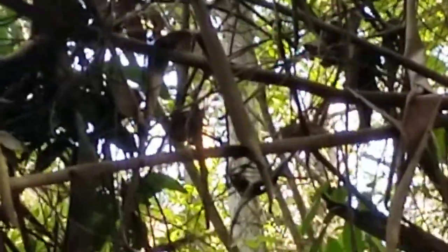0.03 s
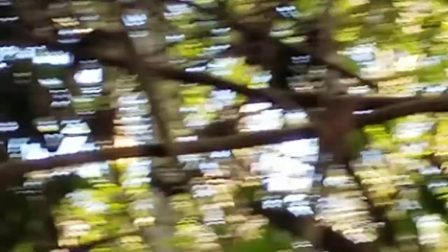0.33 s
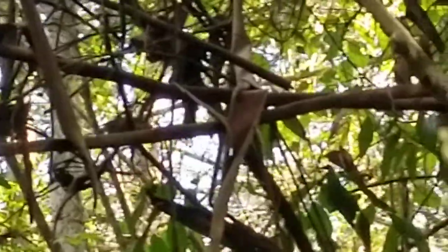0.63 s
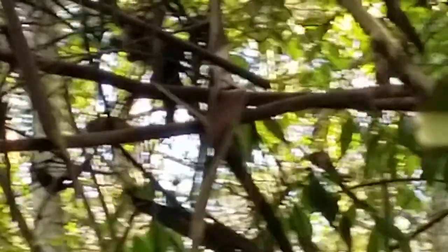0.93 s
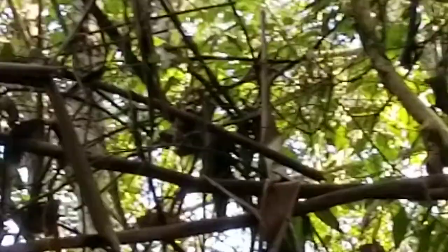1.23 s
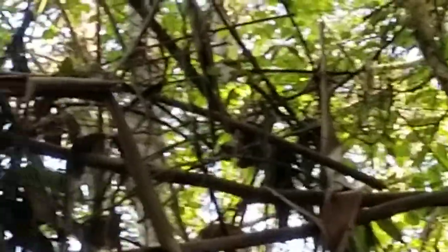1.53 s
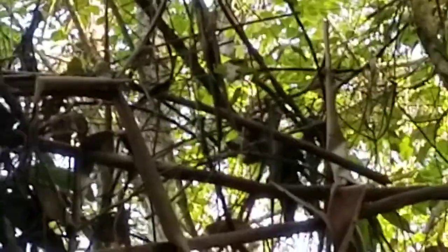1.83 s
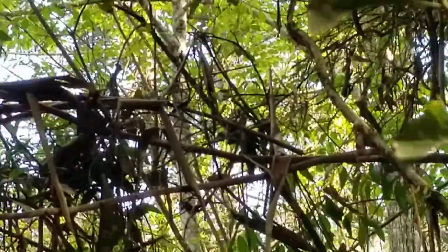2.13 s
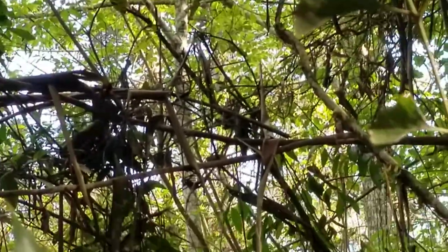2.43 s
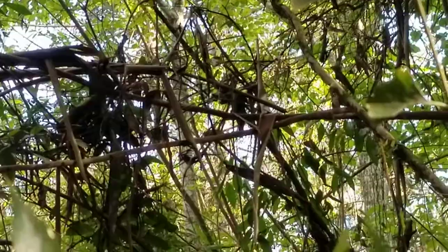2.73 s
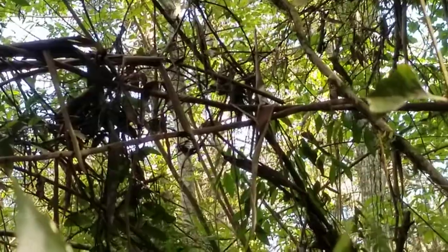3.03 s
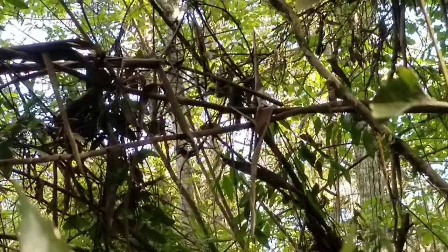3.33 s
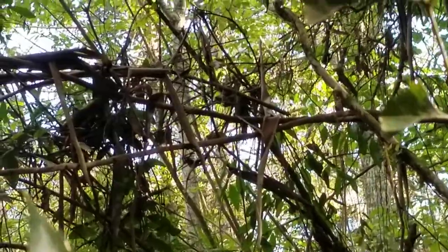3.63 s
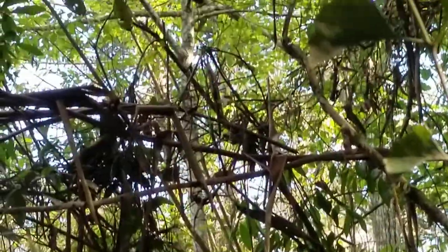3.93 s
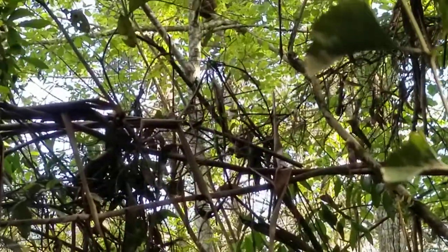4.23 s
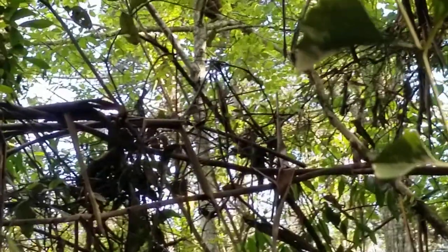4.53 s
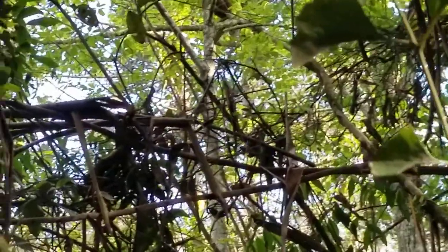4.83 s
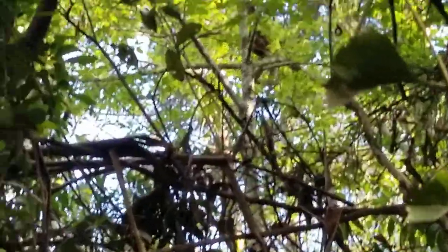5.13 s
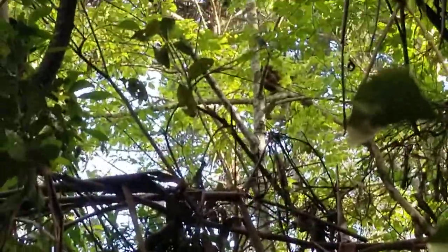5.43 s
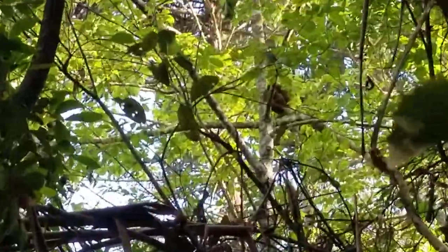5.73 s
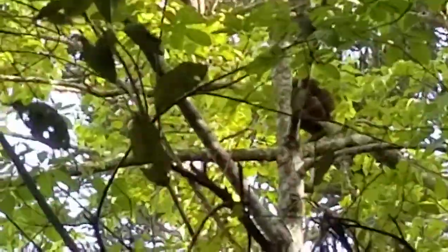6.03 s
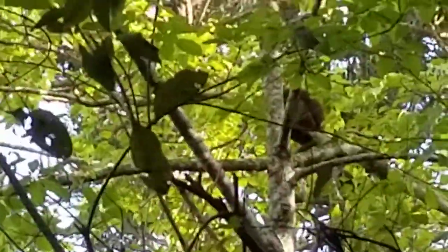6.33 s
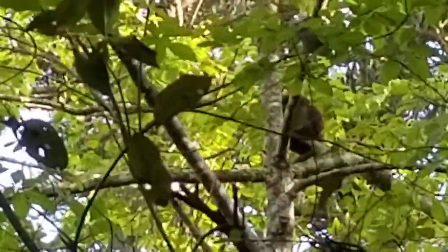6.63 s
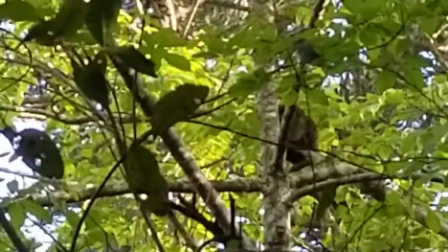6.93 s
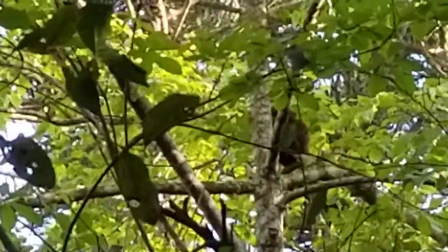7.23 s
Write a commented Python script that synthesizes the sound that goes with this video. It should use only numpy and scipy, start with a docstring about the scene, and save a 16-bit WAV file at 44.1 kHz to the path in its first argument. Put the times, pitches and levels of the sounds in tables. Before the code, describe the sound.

Someone shifts about in a quiet forest with a hand-held microphone. Fingers rub and knock sharply on the left at the start, then leaves brush and crackle in light swishes and small twigs snap throughout. Distant birds whistle with a blurred echo, and a nearer one gives a few hoarse, falling calls midway. A faint drone of far engines and a soft wash of air lie underneath. The sound leans left.

```python
"""Rustling through a forest

Someone shifts about in dry leaves with a hand-held camera: leaves brush and crackle, twigs snap,
and fingers rub and bump the case. Birds whistle far off, blurred by echoes from the trunks,
over the drone of distant engines and a soft wash of air.
The right microphone opening (its port) is muffled, so the sound leans left."""
import sys
import numpy as np
from scipy import signal
from scipy.fft import rfft, irfft, next_fast_len
from scipy.io import wavfile
from scipy.ndimage import uniform_filter1d

SR = 44100
rng = np.random.default_rng(int(sys.argv[2]) if len(sys.argv) > 2 else 0)


def put_to_file(sound):
    """Save the sound as 16-bit audio at rate SR, in the file named by the first command-line argument."""
    columns = np.atleast_2d(sound).T  # one column per channel
    safe = np.clip(columns, -1, 1)
    whole_steps = np.round(safe * 32767)
    wavfile.write(sys.argv[1], SR, whole_steps.astype(np.int16))


N = 320607
T = np.arange(N) / SR

# How the right port muffles sound. Each row: frequency in Hz, gain in dB.
RIGHT_MUFFLING = [(60, -3.5), (120, -7.5), (250, -5.5), (1000, -12), (2400, -10), (5000, -19.5),
                  (8500, -10), (15000, -4.5)]


def foliage():
    """Branches pushed aside: bright leaves, a sparse dry crackle, duller boughs and single ticks."""
    # The tone of leaves and of whole boughs. Each row: frequency in Hz, relative level in dB.
    leaf_tone = [(150, -16.5), (400, 1), (800, -6), (2000, -1), (3000, -1), (3900, 5.5), (4900, 7),
                 (5700, 0.5), (7000, 9.5), (8400, -7), (10500, -10), (12500, -2), (16000, -6)]
    bough_tone = [(150, -17), (500, -4), (900, 1), (1700, 5.5), (2800, 2), (5000, -6.5), (9000, -38),
                  (16000, -47.5)]
    leaf_db, bough_db = stir()
    crackle = rustle(leaf_db + 0.5, leaf_tone, cracks_per_s=110, spread_db=2.5, hiss_db=-33.5)
    leaves = rustle(leaf_db + 7.5, leaf_tone)
    boughs = rustle(bough_db + 9, bough_tone)
    return crackle + leaves + boughs + ticks(leaf_db)


def stir(leaf_rest_db=-76.5, bough_rest_db=-80, rise_share=0.469):
    """How strongly leaves and boughs move, in dB: each swish swells, then settles to a faint rest."""
    # Each row: time of the peak in seconds, length in seconds, leaf level in dB, bough offset in dB.
    swishes = [(0.208, 0.109, -54.5, -8.5), (0.862, 0.54, -62, -10.5), (1.654, 0.274, -54, -7.5),
               (1.903, 0.227, -61.5, -3), (2.294, 0.687, -63.5, -7.5), (2.478, 0.112, -57, -8),
               (2.872, 0.1035, -46.5, -8), (3.38, 1, -62, -11.5), (3.626, 0.042, -55, -6),
               (4.013, 0.173, -64, -31), (4.66, 0.355, -63, -9.5), (5.045, 0.67, -73, -0.5),
               (5.405, 0.249, -57.5, -7), (5.576, 0.567, -61.5, -3.5), (6.628, 0.155, -66, -23),
               (7.246, 0.177, -51.5, -11.5)]
    power = undb([[leaf_rest_db], [bough_rest_db]]) ** 2
    for peak_s, length, db, bough_db in swishes:
        swell = held(peak_s, 0, length * rise_share, length * (1 - rise_share))
        power = power + (undb([[db], [db + bough_db]]) * swell) ** 2
    return 10 * np.log10(power)


def rustle(level_db, tone, cracks_per_s=1100, spread_db=4.5, hiss_db=0, flutter_db=2, right_db=2):
    """Dry leaves brush each other: tiny cracks of very unequal size over a sliding hiss."""
    sizes = undb(spread_db * np.minimum(rng.exponential(size=N), 5))
    cracks = (rng.random(N) < cracks_per_s / SR) * sizes * rng.choice([-1, 1], N)
    flap = rng.standard_normal((2, SR // 150)) * np.exp(-T[:SR // 150] / 0.000622)
    flap = irfft(np.exp(1j * np.angle(rfft(flap))))  # smears each crack in time and gives every frequency the same strength
    crackle = unit(signal.fftconvolve(cracks[None], flap, axes=1)[:, :N])
    hiss = undb(hiss_db) * rng.standard_normal((2, N))
    sound = unit(colour(crackle + hiss, tone))
    return sound * undb(level_db + flutter_db * wander(35)) * undb([[0], [right_db]])


def ticks(stir_db, count=130, boost_db=14.5, spread_db=4, decay_s=0.00416):
    """Leaf edges give single bright ticks, louder (up to a limit) when the leaves stir."""
    out, t = np.zeros((2, N)), T[:SR // 100]
    for when, softness in rng.random((count, 2)):
        i = int(when * (N - 1))
        tick = rng.standard_normal((2, len(t))) * np.exp(-t / decay_s)
        db = min(stir_db[i], -64) + boost_db - spread_db * np.log(softness * 1.37 + 0.185)
        add(out, T[i], tick * undb(db))
    return splinter(out)


def twigs(crack_s=0.00043, ring_width=0.258, trim_db=-3, echo_db=-16):
    """Each snap is a sharp crack and a short splintering tail that makes its stalk ring."""
    # Each row: start in seconds, relative level in dB, ring pitch in Hz, seconds to fade by 60 dB,
    # ring level against the burst in dB.
    snaps = [(.055, -40.5, 4500, 0.0116, -1), (0.2984, -45.5, 7000, .008, -0.5),
             (0.3315, -36.5, 2580, 0.031, 5.5), (.68, -39.5, 1540, 0.026, 7),
             (0.7255, -35.5, 7100, 0.027, -1.5), (0.8289, -36.5, 6900, 0.039, 1.5),
             (1.15, -32, 2688, 0.0088, 16), (1.2473, -34, 6540, 0.0127, 19),
             (1.5789, -33.5, 13000, .012, 7), (1.6404, -27.5, 5230, 0.018, -6),
             (1.708, -26.5, 12000, 0.015, -2.5), (1.771, -33, 4800, 0.013, -0.5),
             (1.7927, -30, 5630, 0.0106, 6.5), (1.93, -37.5, 6000, .012, 3),
             (2.2121, -33, 4960, 0.0286, -11.5), (2.281, -36.5, 13000, 0.019, -1),
             (2.525, -38.5, 4500, 0.0136, 5.5), (3.2454, -23.5, 6540, 0.03, -5),
             (3.26, -27.5, 1770, 0.0414, -15), (3.366, -34, 6000, .015, -4.5),
             (3.424, -40.5, 4534, 0.0123, 4), (3.5101, -34, 4490, 0.0163, 12),
             (3.583, -34, 11950, 0.00772, -2), (3.625, -29.5, 7550, 0.01, 10),
             (3.7602, -34.5, 14000, 0.027, -3), (3.8787, -29, 2380, 0.024, -13.5),
             (4.024, -36.5, 13060, 0.0103, 16.5), (4.8597, -24.5, 14000, 0.0079, -21.5),
             (4.9283, -36.5, 13000, 0.0127, -6.5), (5.3739, -29, 13000, 0.0169, -9),
             (5.5237, -35, 7050, 0.0085, -3), (5.5573, -39.5, 5030, 0.0092, -0.5),
             (5.5988, -39, 6540, 0.0112, 5), (5.7064, -35.5, 4090, 0.0088, -11),
             (6.3263, -33, 3790, 0.0057, 0.5), (6.4117, -23.5, 12430, 0.0197, -9),
             (6.4376, -22, 1470, 0.0164, -8), (7.0497, -36.5, 5990, 0.0144, 1.5),
             (7.1433, -31.5, 7050, 0.018, -15.5), (7.24, -29.5, 6030, 0.014, -4.5)]
    out, t = np.zeros((2, N)), T[:SR // 16]
    for start, db, hz, fade_s, ring_db in snaps:
        decay = fade(t, fade_s) + 2.26 * np.exp(-t / crack_s)
        burst = rng.standard_normal((2, len(t))) * decay
        ring = np.array([resonate(side, hz, hz * ring_width) for side in burst])
        snap = unit(unit(burst) + undb(ring_db) * unit(ring))
        add(out, start, snap * np.sqrt(np.mean(decay ** 2)) * undb(db + trim_db) / 2)
    out = splinter(out)
    return out + undb(echo_db) * trunk_echo(out[0], fade_s=0.13)


def splinter(x):
    """Give a sound the tone of splintering wood."""
    # Each row: frequency in Hz, gain in dB.
    wood_tone = [(200, 4), (800, -5.5), (1700, 4.5), (3000, 3.5), (4500, 3), (7000, 1), (8800, -14),
                 (11000, -4), (13000, -2.5), (16000, -10)]
    return colour(x, wood_tone)


def bumps():
    """A short push makes the case ring; a softer contact lasts longer and sounds duller."""
    # Each row: start in seconds, peak level in dB, left minus right in dB, contact time in
    # milliseconds, grip tightness as a pitch factor, boost of the low thud in dB.
    knocks = [(0.133, -29, 24, 1.46, 2.6, 15.5), (0.2385, -20.5, 35.5, 1.26, 1.63, -1.5),
              (.2830, -1, 45.5, 0.088, 1.025, 2.5), (0.3616, -21, 34.5, 0.74, 2.24, 6),
              (0.3667, -8.5, 29.5, 0.17, 1.85, -8.5), (0.503, -25.5, 29, 2.1, 2.39, 5),
              (0.9284, -22.5, -11.5, 0.575, 0.646, -8.5), (1.15, -19, 9.5, 0.07, 0.97, -6.5),
              (5.534, -36, 4.5, 0.695, 0.74, 3), (6.327, -25, 7, 0.343, 0.85, 3)]
    # The case's ringing tones. Each row: pitch in Hz, seconds to fade by 60 dB, relative level in dB.
    case_tones = [(111.4, 0.0465, -3), (295, 0.00313, 2.5), (568, 0.00368, -2.5), (1140, 0.00269, -5.5),
                  (1947, 0.00229, -2.5), (3200, 0.002, -29), (6710, 0.00316, -6), (16100, 0.00107, 3.5)]
    out, t = np.zeros((2, N)), T[:SR // 10]
    for start, db, pan_db, contact_ms, tightness, thud_db in knocks:
        ring = 0
        for k, (hz, fade_s, tone_db) in enumerate(case_tones):
            # the lowest two are the case rocking in the hand: a tight grip makes them higher and shorter
            speed, boost_db = (tightness, thud_db) if k < 2 else (1, 0)
            sign = 1 if k else -1
            tone = np.sin(2 * np.pi * hz * speed * t) * fade(speed * t, fade_s)
            ring = ring + sign * undb(tone_db + boost_db) * tone
        push = t * np.exp(-t * 4000 / contact_ms)
        thump = signal.fftconvolve(ring, push)[:len(t)]
        sides = undb([[min(pan_db, 0)], [min(-pan_db, 0)]])
        add(out, start, sides * thump / abs(thump).max() * undb(db))
    return out


def fingers(right_db=-12, catch_db=1, skim_db=-38.5):
    """Skin slides beside the left port, catching unevenly, and skims it once so that it hisses."""
    # Each row: start in seconds, length in seconds, level in dB.
    rubs = [(0.153, 0.1525, -50), (0.387, 0.0891, -37)]
    # The tone of sliding skin. Each row: frequency in Hz, relative level in dB.
    skin_tone = [(60, -5.5), (250, 6.5), (600, -2.5), (1200, -4.5), (2500, -5.5), (5000, -13.5), (7000, -6),
                 (8800, -23.5), (12500, -9), (16000, -15)]
    # Where the left port rings. Each row: centre in Hz, width in Hz, relative level in dB.
    port_rings = [(3370, 1810, -11), (6414, 1104, 0), (13900, 5300, -22.5)]
    slide = sum(undb(db) * held(start, length, 0.0135, 0.0642) for start, length, db in rubs)
    skin = unit(colour(rng.standard_normal((2, N)), skin_tone))
    left, right = skin * slide * undb(catch_db * wander(149.7))
    noise = rng.standard_normal(N)
    hiss = sum(undb(db) * resonate(resonate(noise, hz, width), hz, width) for hz, width, db in port_rings)
    skim = unit(hiss) * undb(skim_db) * held(0.1245, 0.0903, rise_s=0.0268, fall_s=0.0243)
    return np.array([left + skim, undb(right_db) * colour(right, RIGHT_MUFFLING)[0]])


def palm(catch_db=2.5):
    """The palm shifts its grip; the dull scuff travels through the case to both ports."""
    # Each row: start in seconds, length in seconds, level in dB.
    scuffs = [(0.132, 0.14, -53.5), (0.502, 0.031, -55.5), (0.624, 0.26, -62.5), (1.047, 0.66, -62),
              (1.841, 0.28, -58.5), (2.039, 0.043, -71.5), (3.279, 0.093, -59), (5.52, 0.55, -67.5),
              (6.33, 0.028, -59), (6.945, 0.341, -66.5)]
    # The tone of a scuff. Each row: frequency in Hz, relative level in dB.
    palm_tone = [(60, -12.5), (170, -0.5), (240, -4.5), (360, 0.5), (550, -4), (780, -3), (1200, -19),
                 (2500, -20.5), (8000, -34.5)]
    grip = sum(undb(db) * held(start, length, 0.0384, 0.117) for start, length, db in scuffs)
    scuff = unit(colour(rng.standard_normal((2, N)), palm_tone))
    return scuff * grip * undb(catch_db * wander(70))


def birds(direct_db=-3.5, split_hz=4000):
    """Gliding whistles and another bird's thin, nearly level piping, heard mostly as echoes."""
    # Each row of both: start in seconds, length in seconds, first and last pitch in Hz, relative dB.
    whistles = [(0.552, 0.192, 2769, 2695, -59.5), (1.187, 0.07, 2426, 2773, -58.5),
                (1.296, 0.22, 2416, 2100, -67.5), (1.782, 0.104, 2794, 1900, -58),
                (1.858, 0.053, 3493, 3827, -55.5), (1.977, 0.088, 9860, 8920, -72),
                (2.092, 0.107, 7040, 6400, -65), (2.392, 0.087, 3281, 2723, -57),
                (2.476, 0.172, 2773, 2736, -59), (3.066, 0.0823, 2025, 2689, -53),
                (3.215, 0.126, 2263, 2026, -59), (3.563, 0.105, 2350, 2747, -58),
                (3.669, 0.0877, 3230, 2993, -60), (3.786, 0.0388, 4470, 4790, -61),
                (4.209, 0.1185, 2250, 2750, -61.5), (4.276, 0.0854, 2888, 3078, -60),
                (4.299, 0.159, 2477, 2478, -61.5), (4.894, 0.0983, 2397, 2768, -59.5),
                (5.72, .14, 2251, 2850, -59.5), (5.97, 0.0485, 8100, 8050, -67),
                (6.033, 0.1, 7754, 6900, -58), (6.137, 0.22, 2649, 2215, -59.5),
                (6.319, 0.1047, 3088, 2626, -56), (6.46, 0.107, 2910, 2507, -63.5),
                (6.644, 0.161, 3230, 2400, -64), (6.981, .15, 3984, 3250, -66),
                (7.091, 0.1028, 2812, 2382, -55.5)]
    pipings = [(2.18, 0.13, 2020, 2004, -63.5), (2.682, 0.0885, 2040, 2256, -61),
               (2.935, 0.266, 2151, 1935, -59.5), (3.469, .16, 1987, 2034, -62.5),
               (3.929, 0.181, 2014, 2060, -61.5), (4.268, 0.225, 2066, 2045, -66.5),
               (4.554, 0.1365, 2076, 2155, -57), (4.878, 0.232, 2081, 2026, -65),
               (5.181, 0.133, 1713, 1702, -61), (5.404, 0.148, 1938, 2240, -60.5),
               (5.726, 0.276, 2168, 1747, -62), (6.516, 0.1274, 2119, 2086, -61),
               (6.681, 0.151, 1969, 2023, -61)]
    calls = np.zeros(N)
    for start, length, first_hz, last_hz, db in whistles:
        wobble = 0.0397 * min(2500 / first_hz, 1)  # high whistles waver less
        add(calls, start, bird_note(length, first_hz, last_hz, wobble) * undb(db))
    for start, length, first_hz, last_hz, db in pipings:
        add(calls, start, bird_note(length, first_hz, last_hz, wobble=0.0225) * undb(db))
    # the leaves soak up high calls sooner than low ones
    high = signal.sosfilt(signal.butter(2, split_hz, "high", fs=SR, output="sos"), calls)
    low = signal.sosfilt(signal.butter(2, split_hz, fs=SR, output="sos"), calls)
    return undb(direct_db) * calls + trunk_echo(low, fade_s=0.676) + trunk_echo(high, fade_s=0.34)


def hoarse_bird(length_s=0.095, fall_share=0.13, direct_db=-4, echo_db=-2):
    """A nearer bird gives a run of hoarse, falling calls with only a short echo."""
    # Each row: start in seconds, first pitch in Hz, relative level in dB.
    rasps = [(3.595, 5150, -61), (3.961, 5560, -59.5), (4.15, 5164, -60.5), (4.37, 4947, -49),
             (4.584, 4750, -50)]
    calls = np.zeros(N)
    for start, hz, db in rasps:
        add(calls, start, bird_note(length_s, hz, hz * (1 - fall_share), wobble=0.0885) * undb(db))
    return undb(direct_db) * calls + undb(echo_db) * trunk_echo(calls, fade_s=0.1387)


def bird_note(length_s, first_hz, last_hz, wobble):
    """One gliding note; a fast wobble, given as a share of the pitch, makes it hoarse."""
    progress = np.linspace(0, 1, int(length_s * SR))
    glide = last_hz + (first_hz - last_hz) * (1 - progress) ** 1.15  # starts fast, then levels off
    hz = glide * (1 + wobble * wander(900, size=SR)[:len(progress)])
    return unit(np.sin(2 * np.pi * np.cumsum(hz) / SR) * np.sqrt(progress * (1 - progress)))


def far_birds():
    """Birds further off sing short notes near their own pitch; only their echoes arrive."""
    # Each row: notes per second, pitch in Hz, spread as a share of the pitch, level in dB.
    singers = [(6.5, 2130, .09, -68.5), (6.7, 1800, 0.13, -81)]
    out, progress = 0, np.linspace(0, 1, SR // 5)
    for rate, hz, spread, db in singers:
        notes = np.zeros(N)
        for k, (late, offset, slide) in enumerate(rng.uniform(-1, 1, size=(48, 3))):
            pitch = hz * (1 + spread * (offset + slide * (progress - .5)))
            note = np.sin(2 * np.pi * np.cumsum(pitch) / SR) * np.sin(np.pi * progress)
            add(notes, (k + late / 2) / rate, note)
        out = out + unit(trunk_echo(notes, fade_s=1)) * undb(db)
    return out


def engines(throb_hz=7.2, throb_db=-19.5, waver_db=1.73):
    """Only the firing tones of two far engines carry through the forest; they throb and waver."""
    # One engine slowly fades, a fainter one gathers speed.
    # Each row: time in seconds, firing rate in Hz, relative level in dB.
    fading = [(0, 69.99, -38), (.25, 69.95, -42.5), (.7, 71.93, -43.5), (1.3, 72.04, -43),
              (1.8, 71.71, -48), (2.15, 72.83, -45), (2.5, 72.8, -51), (3.9, 74.93, -50), (4.9, 74.4, -54),
              (5.65, 70.97, -55.5), (6.1, 70.87, -47.5), (6.72, 73.63, -60), (6.85, 71.82, -52),
              (7.27, 73.7, -52.5)]
    speeding = [(0, 98.6, -54.5), (1.7, 105.5, -66.5), (3, 110.1, -63.5), (4.3, 116.7, -57.5),
                (5.6, 121.6, -65), (7.27, 122.2, -66)]
    out = 0
    for table, trim_db in ((fading, 2.47), (speeding, 1)):
        times, hz, db = np.transpose(table)
        phase = 2 * np.pi * np.cumsum(np.interp(T, times, hz)) / SR
        # a weaker tone just below makes the drone throb
        tone = np.sin(phase) + undb(throb_db) * np.sin(phase - 2 * np.pi * throb_hz * T)
        out = out + unit(tone) * undb(np.interp(T, times, db) + trim_db + waver_db * wander(9.1))
    return out


def air(db=-49, right_db=-3.5, swell_db=0.5, flicker_db=2, alike_below_hz=400):
    """Far treetops and a low rumble: each octave of noise wavers; the bass is alike at both ports."""
    # Each row: frequency in Hz, relative level in dB.
    air_tone = [(25, -15), (50, 0), (64, 4.5), (82, 0.5), (110, -7), (170, -12.5), (215, -15.5),
                (285, -13.5), (420, -25), (700, -26), (1200, -27), (2000, -22.5), (2700, -37),
                (3400, -40.5), (7100, -31), (8300, -55), (12500, -37.5), (16000, -39.5)]
    size = next_fast_len(N)
    hz = np.fft.rfftfreq(size, 1 / SR)
    mid, side = rfft(rng.standard_normal((2, size)))
    side = side * hz / np.hypot(hz, alike_below_hz)
    ports = np.array([mid + side, mid - side]) * gain_at(hz, air_tone)
    out, swell = 0, swell_db * wander(1.419)
    for octave in range(4, 15):
        share = np.clip(1 - abs(np.log2(hz + 1) - octave), 0, 1)
        out = out + irfft(ports * share)[:, :N] * undb(swell + flicker_db * wander(12))
    return unit(out) * undb([[db], [db + right_db]])


def trunk_echo(x, fade_s):
    """Many trunks scatter a sound into a smooth echo, different at each port."""
    tail = rng.standard_normal((2, SR)) * fade(T[:SR], fade_s)
    return signal.fftconvolve(x[None], unit(tail) / np.sqrt(SR), axes=1)[:, :N]


def undb(db):
    """Turn decibels into a gain."""
    return 10 ** (np.asarray(db) / 20)


def unit(x):
    """Scale a signal to an average power of one."""
    return x / np.sqrt(np.mean(x ** 2) + 1e-20)


def fade(t, fade_s):
    """A decay that falls by 60 dB in fade_s seconds."""
    return np.exp(-np.log(1000) * t / fade_s)


def held(start, length, rise_s, fall_s):
    """A loudness curve that grows until start, holds for length seconds and dies away."""
    return np.exp(np.minimum(T - start, 0) / rise_s - np.maximum(T - start - length, 0) / fall_s)


def wander(rate, size=N):
    """A smooth random curve with a spread of one, changing about rate times a second."""
    hold = max(int(SR / rate), 1)
    steps = np.repeat(rng.standard_normal(size // hold + 2), hold)
    return unit(uniform_filter1d(uniform_filter1d(steps, hold), hold))[:size]


def gain_at(hz, tone):
    """Read a tone table's gain at the given frequencies."""
    table_hz, db = np.transpose(tone)
    return undb(np.interp(np.log(hz + 1), np.log(table_hz), db))


def colour(x, tone, size=2048):
    """Filter a sound so that it takes on the given tone."""
    cepstrum = irfft(np.log(gain_at(np.fft.rfftfreq(size, 1 / SR), tone)))
    # folding onto the first half keeps the filter from ringing before a sound begins
    cepstrum[1:size // 2] *= 2
    cepstrum[size // 2 + 1:] = 0
    response = irfft(np.exp(rfft(cepstrum)))
    return signal.fftconvolve(np.atleast_2d(x), response[None], axes=1)[:, :N]


def resonate(x, hz, width_hz):
    """Let through one ringing band, with a gain of one at its centre."""
    return signal.lfilter(*signal.iirpeak(hz, hz / width_hz, SR), x)


def add(out, start, sound):
    """Mix a sound in at start seconds."""
    i = max(int(start * SR), 0)
    out[..., i:i + sound.shape[-1]] += sound[..., :max(N - i, 0)]


def scene():
    """Sound in the air enters by the two ports; handling reaches them through the case."""
    left, right = foliage() + twigs() + air() + engines() + birds() + hoarse_bird() + far_birds()
    airborne = np.array([left, colour(right, RIGHT_MUFFLING)[0]])
    return airborne + fingers() + palm() + bumps()


def record(dry):
    """The camera cuts the bass below 35 Hz and the treble above 16000 Hz."""
    dry = signal.sosfilt(signal.butter(2, 35, "high", fs=SR, output="sos"), dry)
    return signal.sosfilt(signal.ellip(8, .2, 70, 16000, fs=SR, output="sos"), dry)


dry = scene()
out = record(dry)
put_to_file(out)
```